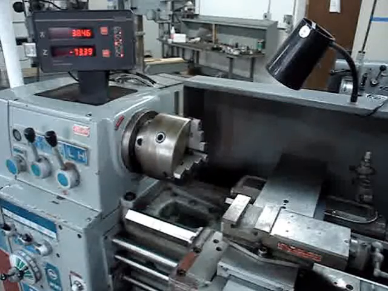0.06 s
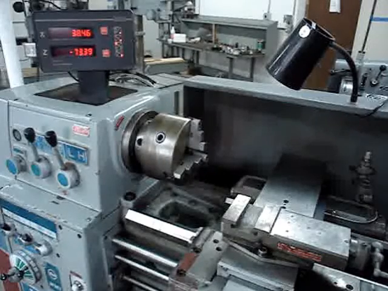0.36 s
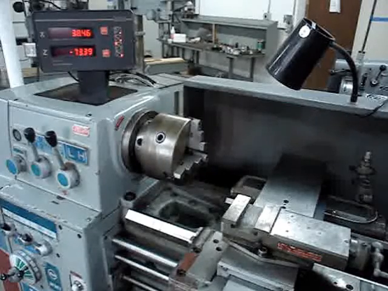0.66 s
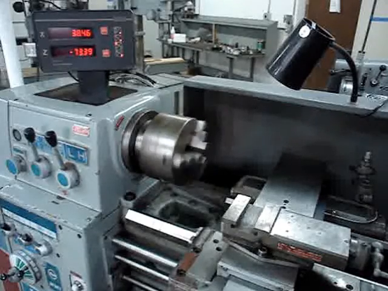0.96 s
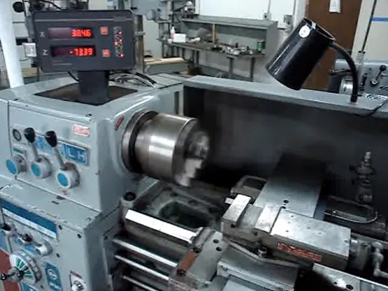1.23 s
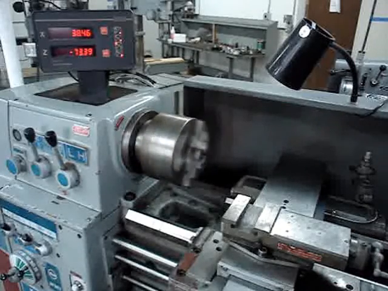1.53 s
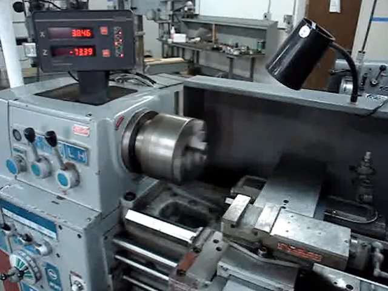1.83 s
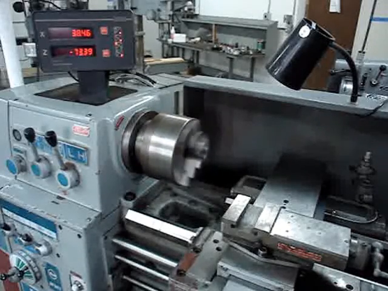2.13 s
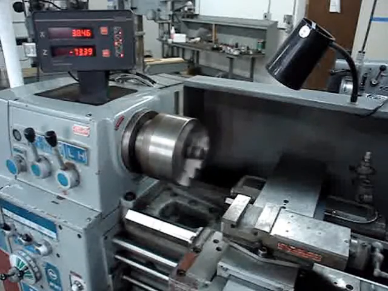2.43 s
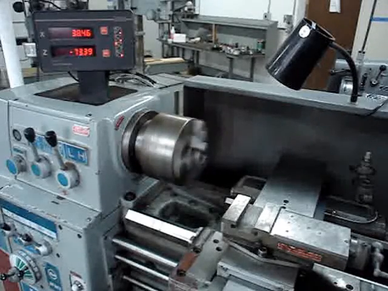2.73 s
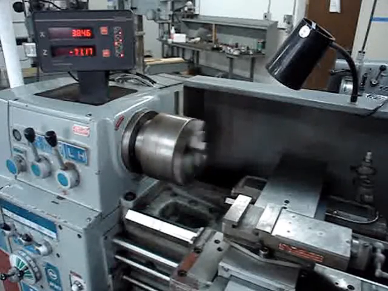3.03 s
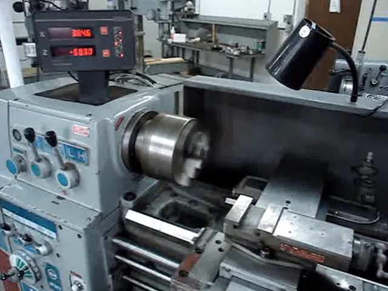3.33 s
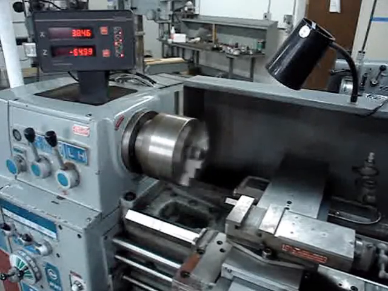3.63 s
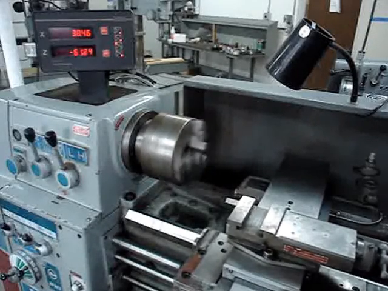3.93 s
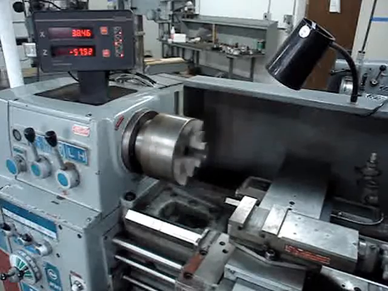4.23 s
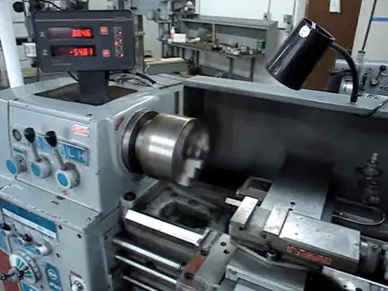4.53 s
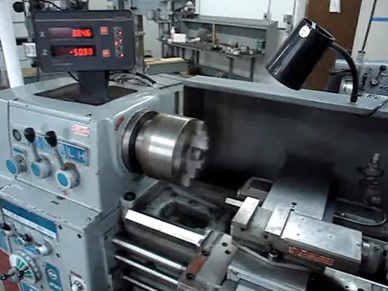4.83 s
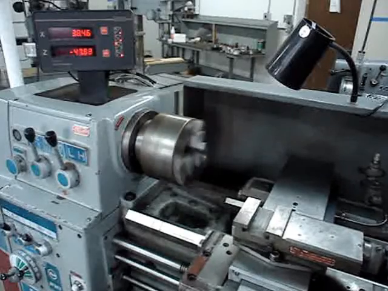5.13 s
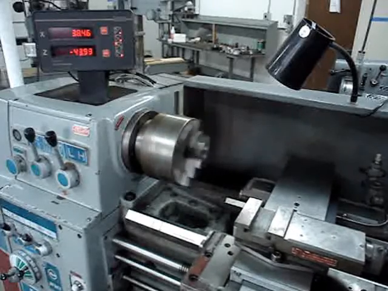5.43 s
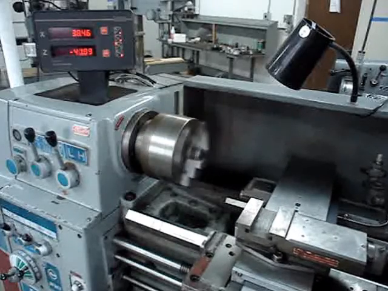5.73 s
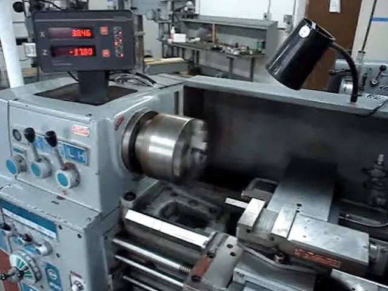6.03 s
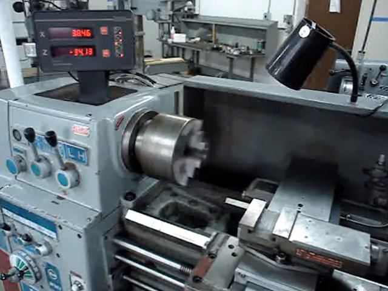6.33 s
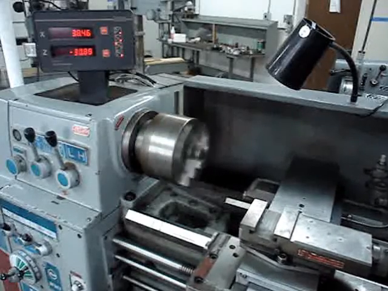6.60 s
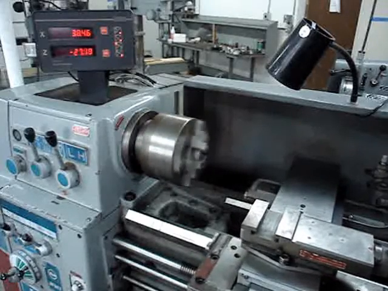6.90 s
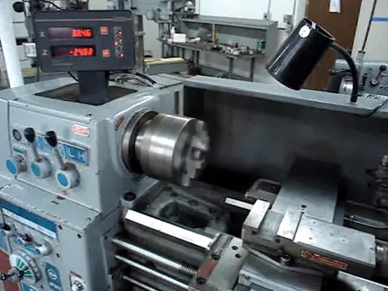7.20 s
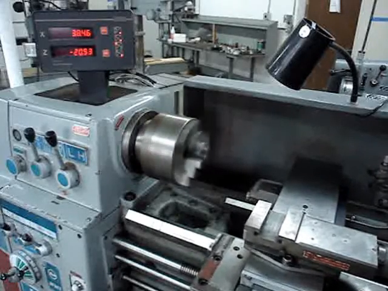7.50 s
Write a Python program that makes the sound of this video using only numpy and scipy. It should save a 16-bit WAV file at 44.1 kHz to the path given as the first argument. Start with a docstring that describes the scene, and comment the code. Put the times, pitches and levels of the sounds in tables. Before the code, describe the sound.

A faint electrical hum and airy drone fill a workshop. At about 0.25 seconds a steel lever clacks with a short bright ring, followed by two faint taps as the drone fades. At about 1 second a metal lathe engages with a loud, rattling slam of gears and a low thud, and a whine rises quickly, reaching full speed by 1.4 seconds. The lathe then runs continuously: two wavering mid-pitched gear tones over a metallic clatter that pulses about six times a second, with low rumble and light hiss. Sharp clicks of the controls come near 1.4, 2, 2.5 and 3 seconds. The gearbox grows gradually louder, with the whine strongest from about 4 to 5.5 seconds. Soft, dull low bumps occur now and then. The machine sounds close, with slight room echo, and is still running at the end, around 7.7 seconds.

```python
"""In a humming workshop, a geared metal lathe starts. A lever clacks, ringing the modes of its steel
linkage; the drive engages, the gears slam through their backlash and whine up to speed. Each of two
meshes sounds at its tooth count times the spindle's rotation rate, over a clatter of tooth impacts that
partly repeats with every turn. The controls click as the feed is put in, and the gearbox grows louder
under the load. Dull low bumps come now and then."""
import sys
import numpy as np
from scipy import signal
from scipy.fft import rfft, irfft, next_fast_len
from scipy.io import wavfile

SR = 44100
rng = np.random.default_rng(int(sys.argv[2]) if len(sys.argv) > 2 else 0)


def to_wav(sig):
    """Store sig (one row per channel, or 1-D mono) as 16-bit WAV at the path in sys.argv[1].

    Samples outside -1..1 are clipped; the rate is SR.
    """
    pcm = np.clip(np.atleast_2d(sig), -1, 1) * 32767
    pcm = np.round(pcm).astype(np.int16)
    wavfile.write(sys.argv[1], SR, pcm.T)  # frames by channels


N = 337802
TIME = np.arange(N) / SR
SPINDLE_HZ, MAIN_TEETH, SECOND_TEETH = 5.7945, 110, 168
ENGAGE_S, FEED_S = .96, 2.8  # the drive engages; the feed is running
KNOCK_PEAK_S = 5.973  # one crest of the once-a-turn knock

# reverberation of the shop: (frequency [Hz], t60 [s])
REVERB_TIMES = [(150, 0.46), (400, 0.45), (1000, 0.82), (2800, 0.77), (7300, 0.42)]
# mains hum: (frequency [Hz], level [dB])
MAINS_HUM = [(120, -66), (240, -65), (360, -65), (480, -59), (600, -65), (720, -65), (840, -72), (960, -71),
             (1080, -72), (1320, -73), (1800, -74), (8032, -79)]
# spectra of the shop air and the opening drone: (frequency [Hz], relative density [dB])
AIR_SPECTRUM = [(18, -28), (30, -4), (64, -10), (358, -3.5), (424, -15.5), (479, -13.5), (554, -12),
                (611, -7.5), (673, -21), (724, -14), (10000, -26.5), (13000, -62), (22000, -120)]
DRONE_SPECTRUM = [(40, -26), (130, -24), (190, -6), (235, 5), (290, -22), (500, -17), (1200, -23.5),
                  (3000, -30.5), (9000, -43)]
# blows of lever and drive: (time [s], relative crash level [dB], crash t60 [s], ping gain [dB])
LEVER_BLOWS = [(.2365, -29, .12, -44), (.2495, -28, .11, -23.5), (.263, -32, .2, -36), (.48, -55, .3, -68),
               (.552, -49, .14, -62), (.96, -32, .1, -44)]
# crash of loose parts: (frequency [Hz], relative density [dB])
CRASH_SPECTRUM = [(30, -13), (120, -13), (200, -2.5), (300, -3), (530, 2.5), (850, -1.5), (1250, -5),
                  (1800, -8), (2700, -10), (4100, -6), (6000, -14.5), (8500, -15.5), (10000, -37)]
# modes of the steel linkage: (frequency [Hz], relative level [dB], t60 [s])
LINKAGE_MODES = [(522, -9, .25), (1590, -16, .3), (2950, -15, .08), (3260, -14, .1), (3620, -8, .06),
                 (3685, 1, .14), (3770, -8, .07), (4100, -7, .12), (5380, -15, .1), (5950, -15, .15),
                 (6990, -20, .12), (8400, -20, .06)]
# the stronger low bumps: (time [s], relative level [dB])
LOW_BUMPS = [(.255, -44), (0.981, -33), (1.07, -41), (2.49, -42), (2.965, -36), (4.44, -40), (4.765, -43),
             (5.44, -49), (5.875, -43), (6.17, -42), (6.465, -42), (7.35, -39)]
# run-up of the spindle: (time [s], share of full speed [1])
SPINDLE_RUN_UP = [(.96, .2), (1.01, .25), (1.04, .33), (1.09, .47), (1.14, .61), (1.175, .69), (1.215, .86),
                  (1.28, 0.94), (1.35, 0.97)]
# gears slamming through their backlash: (time [s], body level [dB], treble level [dB])
BACKLASH_SLAMS = [(.976, -17.5, -35), (.99, -38, -27), (1.013, -19, -36), (1.11, -44, -35)]
# spectra of the slams' body and treble: (frequency [Hz], relative density [dB])
SLAM_BODY_SPECTRUM = [(30, -17), (100, -17), (240, 2), (400, -2), (780, 2), (1200, -2.5), (2100, -1),
                      (3000, -8), (4000, -16), (6000, -35)]
SLAM_TREBLE_SPECTRUM = [(2000, -23), (3500, 0), (5800, 1.5), (7500, -13.5), (10000, -24)]
# headstock resonances under the slams and the clatter: (frequency [Hz], bandwidth [Hz], gain [dB])
SLAM_RESONANCE = [(2130, 230, 3)]
CASTING_RESONANCES = [(805, 33.4, 8.5), (1180, 36, 0.5), (1480, 46, 3), (1735, 82, 5), (1970, 66, 5),
                      (2170, 110, 5.5), (2453, 110, 4.5), (2592, 23, 7), (3145, 76, 5), (3334, 30, 8),
                      (3560, 100, 5.5)]
# mean levels of the two meshes at full speed: (time [s], level [dB])
MAIN_MESH_LEVEL = [(1.5, -36.5), (1.9, -33.5), (3.3, -32.5), (4.1, -24), (5.45, -26), (6.7, -29),
                   (7.2, -28), (7.66, -31.5)]
SECOND_MESH_LEVEL = [(1.6, -42), (2.42, -41), (2.54, -32.5), (3.2, -29), (5.5, -27.5), (7.66, -28.5)]
# gearbox load, growing with the feed: (time [s], level relative to full load [dB])
GEARBOX_LOAD = [(1.25, -6), (1.5, -6), (1.9, -4), (2.45, -3), (2.6, -1), (3.4, -1.5), (4.3, 0),
                (7.66, -0.16)]
# spectra of the gearbox noises: (frequency [Hz], relative density [dB])
CLATTER_SPECTRUM = [(380, -18), (480, -9.5), (600, -3), (670, 0.5), (750, -5.5), (920, -1.5), (1150, -1),
                    (1700, -4), (2300, -7), (2850, -12), (3300, -14.5), (3450, -20), (3800, -20),
                    (4500, -36)]
HISS_SPECTRUM = [(3200, -12.5), (4000, -2.5), (4600, 2.5), (5500, -2), (6000, -3.5), (7000, -6.5),
                 (8500, -7.5), (10000, -12.5)]
RUMBLE_SPECTRUM = [(25, -24.5), (62, -32.5), (85, -21.5), (110, -19.5), (140, -6.5), (200, 0.5), (260, 2.5),
                   (300, -5), (400, -8.5), (470, -2.5)]
RUB_SPECTRUM = [(4600, -20), (4950, -5), (5200, 0), (5500, -5), (5900, -20)]
# weaker tones of the gear train: (order [cycles per spindle turn], relative level [dB])
GEAR_ORDERS = [(25.23, -49), (29, -53), (47.5, -51), (62.14, -49), (75.4, -51), (84.1, -51), (87, -45),
               (101.3, -45), (115.8, -47), (119.7, -44), (126, -44), (139, -45), (141, -47), (144, -47),
               (155, -48), (183, -48), (197, -45), (220, -40), (258.4, -47), (275, -43), (294, -42),
               (326.3, -45), (378, -46), (381.3, -47), (393, -48), (445, -51), (550, -56), (882, -63)]
# low hum of the drive: (time [s], level [dB])
DRIVE_HUM_LEVEL = [(1.3, -79), (1.8, -61), (3.2, -59), (3.8, -67), (5.0, -52.5), (5.5, -51.5), (6.8, -59),
                   (7.66, -55)]
# clicks of the controls: (time [s], level [dB], centre [Hz], half-width [octaves], t60 [s])
CONTROL_CLICKS = [(1.4205, -16, 1900, .42, .025), (1.421, -28, 4500, .25, .025),
                  (1.971, -24, 4000, .55, .025), (1.981, -36, 6500, .35, .07),
                  (2.4923, -24.5, 3800, .42, .03), (2.503, -37, 5000, .4, .06),
                  (2.9415, -32.5, 7600, .25, .05), (2.9653, -23, 4300, .55, .022),
                  (2.967, -35, 8000, .25, .08), (2.983, -35, 7000, .4, .07), (5.991, -44, 7500, .3, .2)]


def from_db(db):
    """Amplitude grows tenfold for every 20 dB."""
    return 10 ** (np.asarray(db) / 20)


def unit_rms(x):
    """Normalisation to a mean power of one."""
    return x / np.sqrt(np.mean(x ** 2) + 1e-20)


def in_time(points):
    """Linear interpolation of (time, value) points at every sample."""
    return np.interp(TIME, *np.transpose(points))


def at_hz(points, hz):
    """Interpolation on a logarithmic frequency axis."""
    frequencies, values = np.transpose(points)
    return np.interp(np.log(np.maximum(hz, 1)), np.log(frequencies), values)


def coloured(spectrum, source=None):
    """Source and filter: a spectrum with steep skirts shapes the source (default white noise); rms 1."""
    source = rng.standard_normal(N) if source is None else source
    size = next_fast_len(N, real=True)
    hz = np.maximum(np.fft.rfftfreq(size, 1 / SR), 1)
    skirts = np.minimum(1, np.minimum(hz / spectrum[0][0], spectrum[-1][0] / hz)) ** 3
    response = from_db(at_hz(spectrum, hz)) * skirts
    return unit_rms(irfft(rfft(source, size) * response, size)[:N])


def resonate(x, resonances):
    """Each resonance amplifies a narrow band about its natural frequency."""
    return x + sum((from_db(db) - 1) * signal.lfilter(*signal.iirpeak(hz, hz / width, fs=SR), x)
                   for hz, width, db in resonances)


def drift(corner_hz):
    """Low-passed noise wanders smoothly, with an rms of one."""
    hop, warm_up = 100, 1000
    pole = np.exp(-2 * np.pi * corner_hz * hop / SR)
    noise = rng.standard_normal(N // hop + warm_up + 2)
    slow = signal.lfilter([1], [1, -2 * pole, pole * pole], noise)[warm_up:]
    return np.interp(np.arange(N) / hop, np.arange(len(slow)), unit_rms(slow))


def decay(start, t60):
    """Free decay: after a sudden onset, damping takes away 60 dB every t60 seconds."""
    return (TIME >= start) * from_db(-60 * np.clip((TIME - start) / t60, 0, 4))


def strain(db, attack_s, hold_s, t60):
    """Envelope of a forced vibration that builds as the drive engages, holds, then decays."""
    t = TIME - ENGAGE_S
    rise = np.clip(t / attack_s, 0, 1) ** 2
    return rise * from_db(db - 60 * np.clip((t - attack_s - hold_s) / t60, 0, 4))


def each_turn(turns, peak_s):
    """Rotational modulation: one cosine cycle per turn, with a crest at peak_s."""
    return np.cos(2 * np.pi * (turns - np.interp(peak_s, TIME, turns)))


def room(x, wet_db):
    """Reverberation: part of the power goes to a diffuse tail whose octaves decay at their own rates."""
    t, tail = TIME[:SR], 0
    for low in 60 * 2. ** np.arange(8):
        band = signal.butter(2, [low, 2 * low], "band", fs=SR, output="sos")
        fall = from_db(-60 * t / at_hz(REVERB_TIMES, low * np.sqrt(2)))
        tail += signal.sosfilt(band, rng.standard_normal(SR)) * fall * (t > .005)
    diffuse = signal.fftconvolve(x, tail / np.linalg.norm(tail))[:N]
    wet = from_db(wet_db)
    return (x + wet * diffuse) / np.hypot(1, wet)


def shop():
    """Superposition of mains hum, broadband air noise and a drone that decays after the first clack."""
    hum = sum(from_db(db) * np.sqrt(2) * np.sin(2 * np.pi * (hz * TIME + rng.random()))
              for hz, db in MAINS_HUM)
    air = from_db(-55.5) * coloured(AIR_SPECTRUM)
    fading = np.where(TIME < .25, 1, decay(.25, t60=.6))
    return hum + air + from_db(-45.5) * fading * coloured(DRONE_SPECTRUM)


def lever_clacks():
    """Impact excitation: each blow sets loose parts crashing and the linkage's damped modes ringing."""
    crash = coloured(CRASH_SPECTRUM) * from_db(2 * drift(150))
    crashes = pings = 0
    for start, crash_db, crash_t60, ping_db in LEVER_BLOWS:
        ring = sum(from_db(db) * decay(start, t60) * np.sin(2 * np.pi * (hz * TIME + rng.random()))
                   for hz, db, t60 in LINKAGE_MODES)
        crashes += from_db(crash_db) * crash * decay(start, crash_t60)
        pings += from_db(ping_db) * ring
    return room(pings, wet_db=-17) + from_db(5) * room(crashes, wet_db=-4)


def low_bumps(hz=36, t60=.066):
    """Heavily damped oscillations of a cycle or two; faint ones come at random once the feed runs."""
    faint = [(start, -48) for start in rng.uniform(FEED_S, TIME[-1], size=9)]
    return from_db(7) * sum(from_db(db) * decay(start, t60) * np.sin(2 * np.pi * hz * (TIME - start))
                            for start, db in LOW_BUMPS + faint)


def spindle_turns():
    """The spindle's angle, in turns, is the time integral of its speed."""
    share = in_time(SPINDLE_RUN_UP + [(1.45, .997), (2.0, 1)])
    return np.cumsum(share) * SPINDLE_HZ / SR


def take_up():
    """Backlash closes in impacts: gears rattle, the frame thuds, the motor grunts at twice the hum."""
    body_gain = strain(-20, attack_s=.035, hold_s=.045, t60=1.15)
    body_gain += sum(from_db(db) * decay(start, t60=.059) for start, db, _ in BACKLASH_SLAMS)
    treble_gain = sum(from_db(db) * decay(start, t60=.15) for start, _, db in BACKLASH_SLAMS)
    body = body_gain * coloured(SLAM_BODY_SPECTRUM, resonate(rng.standard_normal(N), SLAM_RESONANCE))
    treble = treble_gain * coloured(SLAM_TREBLE_SPECTRUM)
    rattle = (body + treble) * from_db(drift(70))
    grunt = from_db(-15) * decay(.98, t60=.096) * np.sin(2 * np.pi * 240 * TIME)
    thud = from_db(-30) * decay(.97, t60=.09) * np.sin(2 * np.pi * 80 * (TIME - .98))
    return room(rattle + grunt, wet_db=-7) + thud


def mesh_whine(turns):
    """Two meshes sing at their tooth-passing rates; at full speed one wavers and the other throbs."""
    main, second = (np.sqrt(2) * np.sin(2 * np.pi * teeth * turns + .1 * drift(11))
                    for teeth in (MAIN_TEETH, SECOND_TEETH))
    rising = strain(-31, attack_s=.2, hold_s=.11, t60=.35) * main
    rising += strain(-19.5, attack_s=.095, hold_s=.115, t60=.33) * second
    main_db = in_time(MAIN_MESH_LEVEL) + 4 * np.tanh(drift(6.1))
    second_db = in_time(SECOND_MESH_LEVEL) + 2.5 * each_turn(turns, KNOCK_PEAK_S) + 1.5 * drift(3.2)
    steady = from_db(main_db) * main + from_db(second_db) * second
    settled = np.clip((TIME - 1.35) / .47, 0, 1)
    chatter = from_db(2.4 * drift(60) - 1)  # of the straining teeth
    return room(rising * chatter, wet_db=-1) + settled * steady


def tooth_noise(turns, repeat):
    """Tiny tooth impacts as periodic plus random excitation; repeat is the periodic share of power."""
    size = round(SR / SPINDLE_HZ)
    flaws = rng.standard_normal(size)[(turns * size).astype(int) % size]
    return np.sqrt(repeat) * flaws + np.sqrt(1 - repeat) * rng.standard_normal(N)


def tooth_clatter(turns, load_db):
    """Uneven tooth impacts hiss and excite the casting's resonances, harder on one side of each turn."""
    knock = from_db(.6 * drift(50) + .5 * each_turn(turns, KNOCK_PEAK_S))
    impacts = tooth_noise(turns, repeat=.32) * from_db(2 * drift(300))
    clatter = coloured(CLATTER_SPECTRUM, resonate(impacts, CASTING_RESONANCES))
    hiss = coloured(HISS_SPECTRUM, tooth_noise(turns, repeat=.028))
    return knock * (from_db(-22.3 + load_db) * clatter + from_db(-44.5 + .39 * load_db) * hiss)


def rumble(turns, load_db):
    """Low forced vibration of the headstock under the tooth impacts, growing steeply with load."""
    level_db = -35.5 + 1.62 * load_db + 1.5 * drift(4)
    return from_db(level_db) * coloured(RUMBLE_SPECTRUM, tooth_noise(turns, repeat=.16))


def rub(turns, load_db):
    """Friction noise in a high band, swelling once and rippling three times per turn."""
    swish_db = 6.5 * each_turn(turns, peak_s=5.923) + 4 * each_turn(3 * turns, peak_s=5.957)
    level_db = -54 + 1.1 * load_db + swish_db
    return from_db(level_db) * coloured(RUB_SPECTRUM, tooth_noise(turns, repeat=.4))


def gear_tones(turns, load_db):
    """Rotational orders: the many gears add weak, wavering tones at set ratios to the spindle rate."""
    tones = sum(from_db(db + 1.6 * drift(1.7)) * np.sin(2 * np.pi * order * turns + .51 * drift(1.1))
                for order, db in GEAR_ORDERS)
    return from_db(2.5 + load_db) * tones


def drive_hum(turns, order=15.43):
    """A low rotational order of the drive that slowly swells and sinks."""
    gain = (TIME > DRIVE_HUM_LEVEL[0][0]) * from_db(in_time(DRIVE_HUM_LEVEL))
    return gain * np.sqrt(2) * np.sin(2 * np.pi * order * turns)


def control_clicks(attack_s=.0004):
    """Brief contacts of steel on steel radiate bright, quickly damped bands of noise."""
    snaps = 0
    for start, db, hz, octaves, t60 in CONTROL_CLICKS:
        ratio = 2 ** octaves
        band = [(hz / ratio ** 2, -18), (hz / ratio, -4), (hz, 0),
                (hz * ratio, -4), (hz * ratio ** 2, -18)]
        attack = np.clip((TIME - start) / attack_s, 0, 1)
        snaps += from_db(db) * attack * decay(start, t60) * coloured(band)
    return room(snaps, wet_db=-13.5)


def scene():
    """Superposition of lathe and shop in one channel; the rotating parts share the spindle's angle."""
    turns, load_db = spindle_turns(), in_time(GEARBOX_LOAD)
    spinning = np.clip((TIME - .98) / .33, 0, 1)
    gearbox = spinning * sum(part(turns, load_db) for part in (tooth_clatter, rumble, rub, gear_tones))
    lathe = gearbox + mesh_whine(turns) + drive_hum(turns) + take_up()
    return (lathe + lever_clacks() + control_clicks() + low_bumps() + shop())[None]


def record(dry):
    """Soft saturation rounds the highest peaks; a steep low-pass filter cuts the top treble."""
    ceiling, cutoff_hz = .42, 10150
    rounded = dry / (1 + (dry / ceiling) ** 6) ** (1 / 6)
    return signal.sosfilt(signal.ellip(12, .1, 80, cutoff_hz, fs=SR, output="sos"), rounded)


dry = scene()
out = record(dry)
to_wav(out)
```